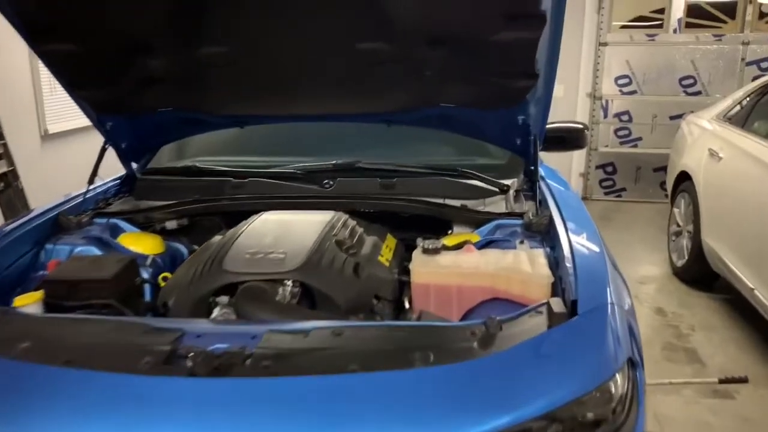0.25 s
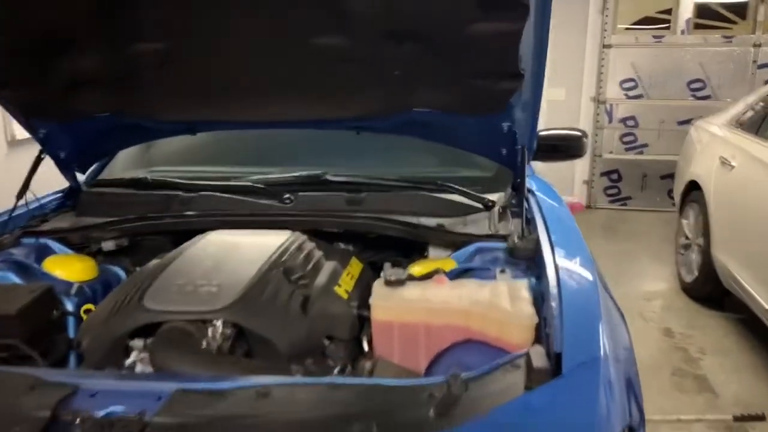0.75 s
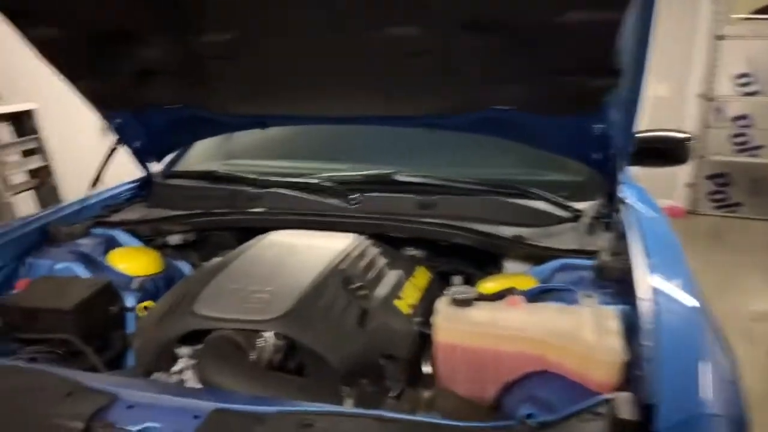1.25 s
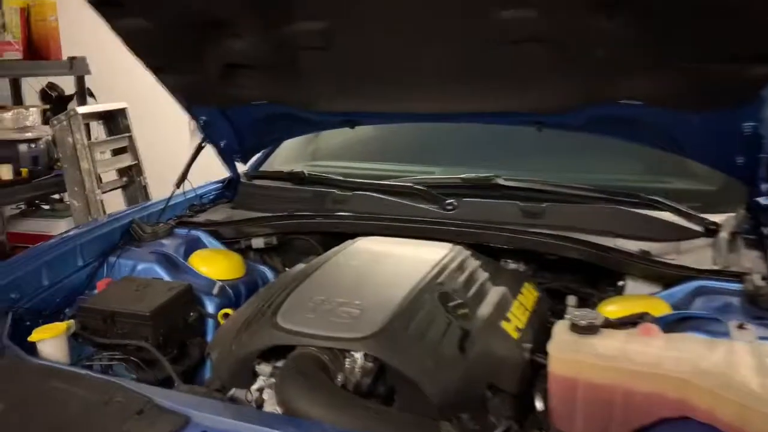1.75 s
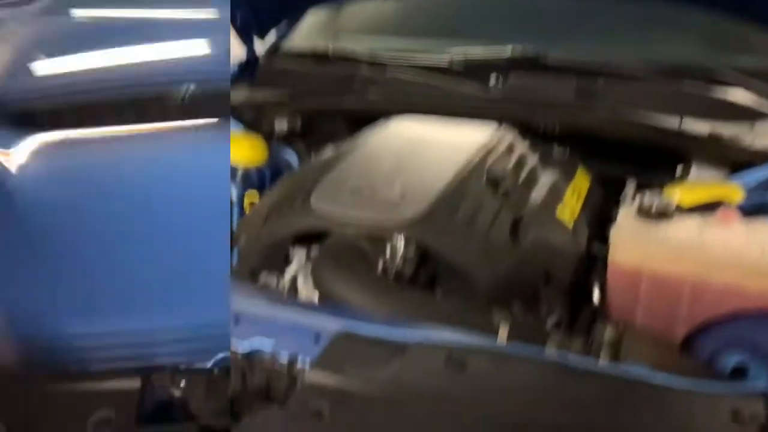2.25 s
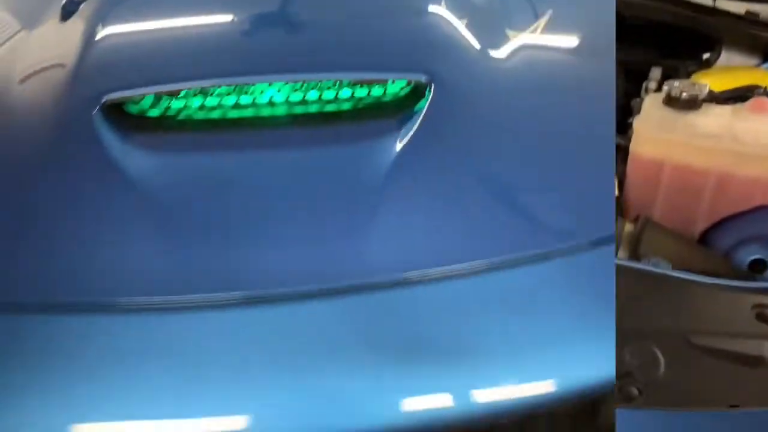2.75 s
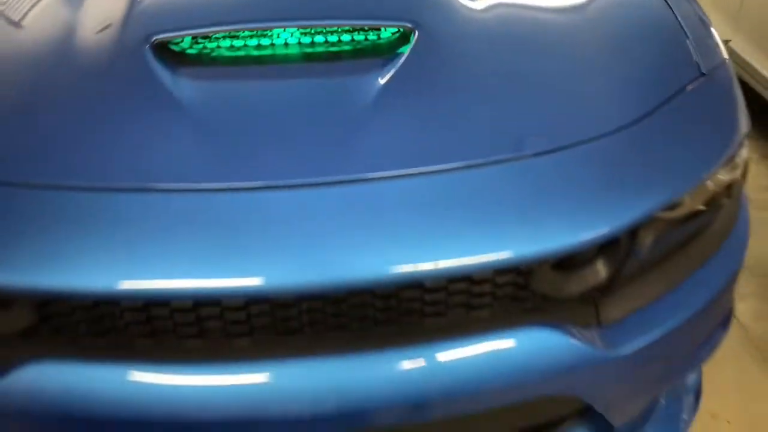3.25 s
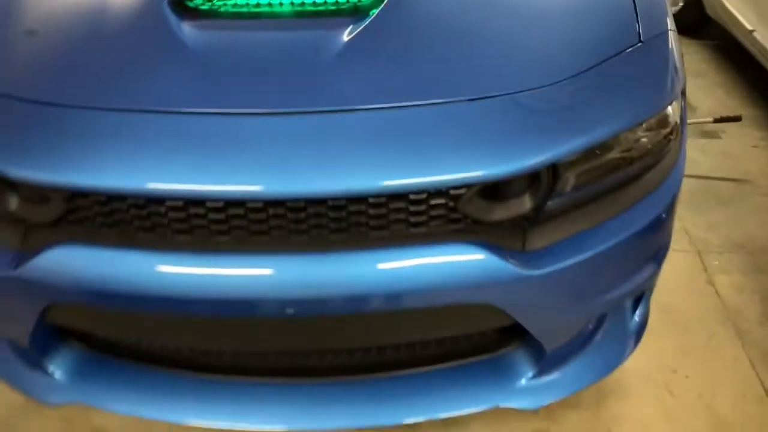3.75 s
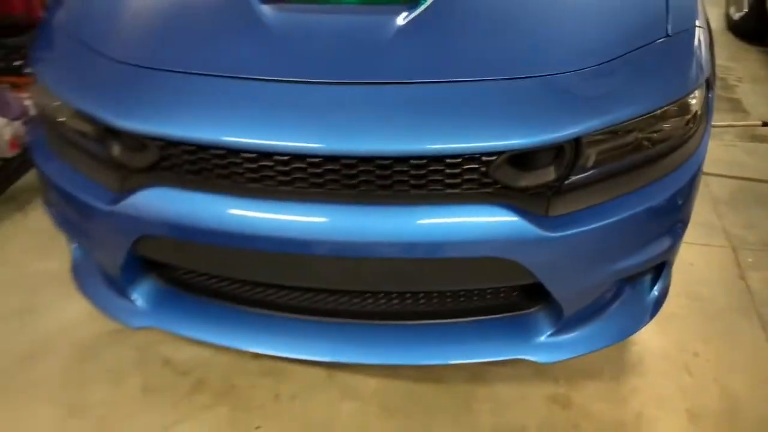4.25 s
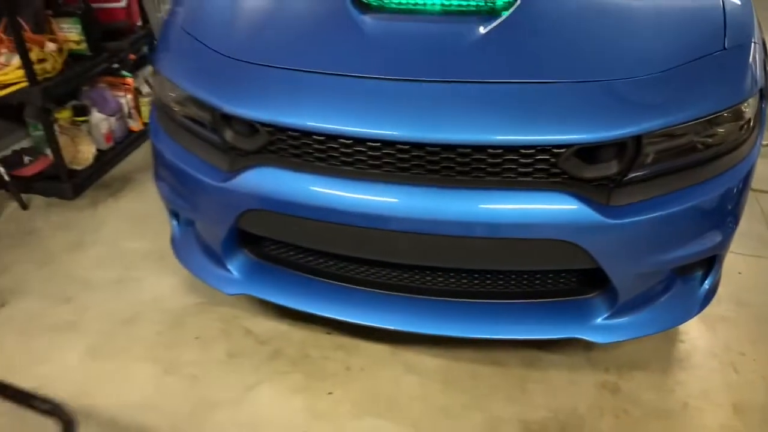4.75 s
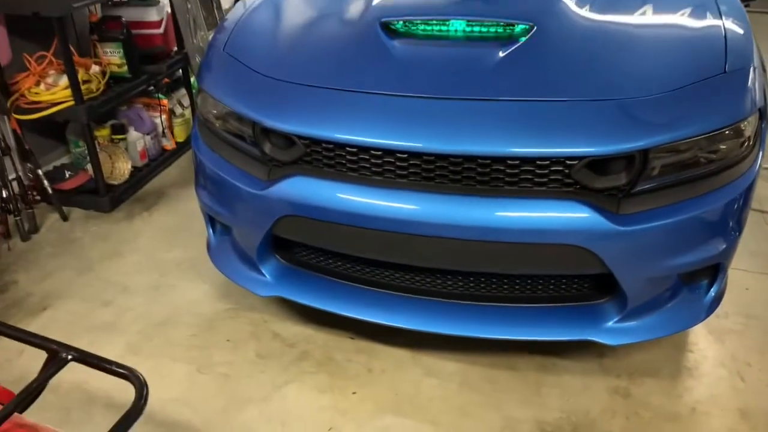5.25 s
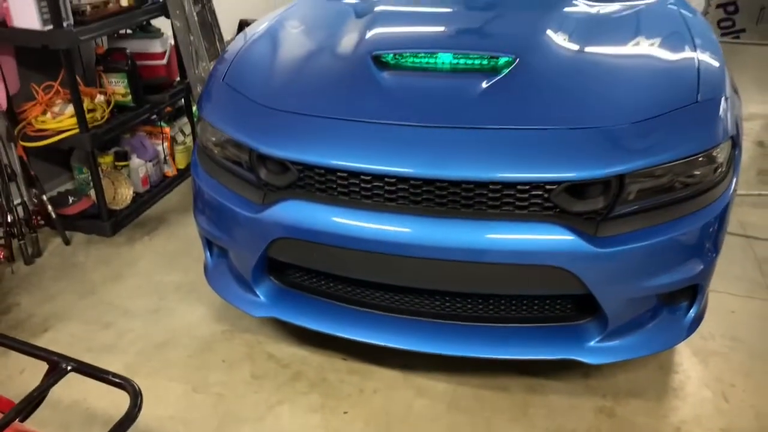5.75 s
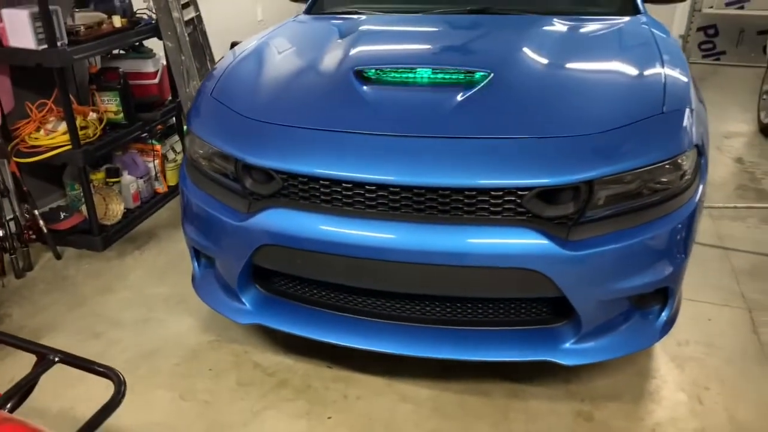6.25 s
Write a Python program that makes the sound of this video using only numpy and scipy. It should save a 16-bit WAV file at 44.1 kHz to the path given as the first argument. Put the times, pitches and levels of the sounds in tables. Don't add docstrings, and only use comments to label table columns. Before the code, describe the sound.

Faint handling rustles and scuffs in a garage, then a car hood slams with a huge flattened bang, metallic ring, and soft footsteps afterward.

```python
import sys
import numpy as np
from scipy import signal
from scipy.fft import rfft, irfft
from scipy.io import wavfile
from scipy.ndimage import uniform_filter1d, minimum_filter1d

SR = 44100
rng = np.random.default_rng(int(sys.argv[2]) if len(sys.argv) > 2 else 0)


def persist_wave(psi):
    counts = np.round(np.clip(psi, -1, 1) * 32767).astype(np.int16)
    wavfile.write(sys.argv[1], SR, np.atleast_2d(counts).T)


def volts(x):
    e = np.asarray(x, float) / 20
    return 10 ** e


N = 287091


def evened(x):
    return x / np.sqrt(np.mean(x ** 2) + 1e-20)


def coloured(x, points):
    f, db = np.transpose(points)
    hz = np.fft.rfftfreq(len(x), 1 / SR) + 1
    gain = volts(np.interp(np.log(hz), np.log(f), db, -90, -90))
    return irfft(rfft(x) * gain, len(x))


def add(mix, s, sound):
    part = mix[round(s * SR):][:len(sound)]
    part += sound[:len(part)]


def resonate(x, hz, width):
    turn = np.exp(2j * np.pi * np.cumsum(hz * np.ones(len(x))) / SR)
    r = np.exp(-np.pi * width / SR)
    return 2 * (turn * signal.lfilter([1 - r], [1, -r], x / turn)).real


def lumps(ms, depth_db):
    size = max(int(ms * SR / 1000), 1)
    wander = uniform_filter1d(uniform_filter1d(rng.standard_normal(N), size), size)
    return evened(volts(depth_db * evened(wander)))


def swells(rows, rise, fall):
    t = np.arange(0, N, 32) / SR
    power = 0
    for s, hold, db in rows:
        below_db = rise * np.maximum(s - t, 0) + fall * np.maximum(t - s - hold, 0)
        power = power + volts(db - below_db) ** 2
    return np.interp(np.arange(N) / SR, t, np.sqrt(power))


def slam():
    # (time [s], level [dB], t60 [s])
    cracks = [
        (2.2238, -6, 0.04),
        (2.238, -6.5, .04),
        (2.2465, -13.5, 0.048),
        (2.261, -20, 0.069),
    ]
    # (frequency [Hz], level [dB per Hz])
    crack_tone = [(590, -30.5), (1000, -0.5), (2230, -14), (3050, -4), (6400, -9.5), (7350, -12),
                  (9720, -6.5), (16000, -18.5)]
    # (frequency [Hz], level [dB], t60 [s])
    modes = [(204, -38.5, 1.8), (248, -30.5, 2.24), (272.4, -24, 0.67), (332.8, -17, .65),
             (395, -41.5, 2.6), (424, -39.5, 1.5), (506, -38, 1.7), (700, -53.5, 2.2), (746, -45, 2),
             (797, -45.5, 2.5), (1005, -44.5, 1), (1841, -46.5, .8), (2750, -41.5, .7), (2715, -39.5, 1.42)]
    slam_s, touch_s = 2.2245, 3.23
    t, out = np.arange(int(1.7 * SR)) / SR, np.zeros(N)

    sizzle = evened(coloured(rng.standard_normal(6000), crack_tone))
    short_t = t[:6000]
    for k, (s, db, t60) in enumerate(cracks):
        fading = volts(db - 60 * short_t / t60) * np.minimum(short_t / .0008, 1)
        add(out, s, np.roll(sizzle, 1000 * k) * fading)

    clatter = lumps(ms=5, depth_db=1.2)[:len(t)]
    add(out, slam_s, volts(-5) * boom(t) * clatter)
    add(out, slam_s + 0.0023, volts(-1.5 - 60 * t / 0.023) * np.sin(2 * np.pi * 170 * t))

    touched = np.maximum(t + slam_s - touch_s, 0)
    for (hz, db, t60), phase in zip(modes, rng.random(len(modes))):
        fall_db = 60 * t / t60
        if hz < 600:
            fall_db = fall_db + 60 * touched / 0.11
        ring = np.sin(2 * np.pi * (hz * t + phase)) * np.minimum(t / 0.06, 1)
        add(out, slam_s, volts(db - fall_db) * ring)
    return out


def boom(t):
    # (frequency [Hz], level [dB per Hz])
    body = [(28, -21), (55, 1), (95, -13), (170, -3.5), (370, 2), (620, -10.5), (1250, -13), (3500, -26.5)]
    # (frequency [Hz], level [dB per Hz])
    thin_metal = [(3500, -26.5), (8500, -30.5), (12500, -25), (15500, -41.5)]
    # (frequency [Hz], rise [s])
    rises = [(70, 0.023), (160, 0.0057), (330, 0.021), (900, 0.011), (4000, .009), (9000, 0.015)]
    # (frequency [Hz], t60 [s])
    decays = [(28, 1.8), (60, 1.09), (100, 1.08), (170, 0.64), (800, 0.84), (2500, 0.92), (7000, 0.69),
              (15500, 0.273)]
    tone = body + thin_metal[1:]
    centres = np.linspace(np.log(tone[0][0]), np.log(tone[-1][0]), num=36)
    log_hz = np.log(np.fft.rfftfreq(len(t), 1 / SR) + 1)
    noise = rfft(rng.standard_normal(len(t)))

    def at(centre, points):
        f, value = np.transpose(points)
        return np.interp(centre, np.log(f), value)

    out, power = 0, 0
    for k, centre in enumerate(centres):
        window = np.interp(log_hz, centres, np.arange(len(centres)) == k, 0)
        band = irfft(noise * window, len(t)) * volts(at(centre, tone))
        swell = 1 - np.exp(-t / at(centre, rises))
        out = out + band * swell * volts(-60 * t / at(centre, decays))
        power += np.mean(band ** 2)
    return out / np.sqrt(power)


def sole():
    # (time [s], pitch [Hz], level [dB])
    squeal = [
        (3.585, 521, -73),
        (3.65, 536.5, -68),
        (3.7, 551, -62),
        (3.74, 576, -64.5),
        (3.768, 615.4, -64),
        (3.82, 624, -67),
        (3.9, 625, -58.5),
        (3.95, 628, -58.5),
        (3.98, 632, -70),
    ]
    # (time [s], peak [dB], pitch [Hz])
    jerks = [
        (3.756, -33, 170),
        (3.8003, -30, 189),
        (3.8505, -33.5, 180),
        (3.8808, -37.5, 190),
        (3.913, -42, 201),
        (3.924, -39, 193),
    ]
    s, hz, db = np.transpose(squeal)
    t, out = np.arange(s[0], s[-1], 1 / SR), np.zeros(N)
    tone = np.sqrt(2) * np.sin(2 * np.pi * np.cumsum(np.interp(t, s, hz)) / SR)
    uneven = lumps(ms=8, depth_db=2.6)[:len(t)]
    add(out, s[0], tone * volts(np.interp(t, s, db)) * uneven * signal.windows.tukey(len(t), .2))

    t = np.arange(-.012, .025, 1 / SR)
    for s, db, hz in jerks:
        low = np.cos(2 * np.pi * hz * t - .3) * np.exp(-(t * hz / 0.48) ** 2)
        high = volts(-14) * np.cos(2 * np.pi * 430 * t) * np.exp(-(t / 0.0034) ** 2)
        add(out, s + 0.00476 + t[0], volts(db) * (low + high) / 1.34)
    return out


def slide():
    # (time [s], level [dB], centre [Hz])
    path = [
        (3.9, -89, 945),
        (3.931, -52.5, 980),
        (3.952, -55.5, 1150),
        (3.96, -57, 1900),
        (3.99, -56, 1900),
        (4.03, -71, 1590),
        (4.102, -81, 1534),
        (4.198, -82, 1400),
    ]
    s, db, hz = np.transpose(path)
    t, out = np.arange(s[0], s[-1], 1 / SR), np.zeros(N)
    grit = rng.standard_normal(len(t)) * lumps(11.0, 3.7)[:len(t)]
    centre = np.interp(t, s, hz)
    rasp = evened(resonate(resonate(grit, centre, 1150), centre, 1150))
    add(out, s[0], volts(np.interp(t, s, db)) * rasp)
    return out


def steps():
    # (time [s], peak [dB], starting pitch [Hz],
    # t60 [s], room [dB])
    footfalls = [
        (3.238, -43, 301, 0.092, -8.5),
        (3.449, -38.5, 50.3, 0.18, -24),
        (4.296, -34.5, 273, 0.0096, -7.5),
        (4.691, -56.5, 261, 0.049, -20),
        (5.37, -49, 248, 0.035, -6),
    ]
    # (time [s], peak [dB], starting pitch [Hz], t60 [s], room [dB])
    bumps = [
        (.4045, -40, 680, 0.031, -21),
        (1.102, -44, 190, 0.11, -17),
        (1.4, -48.5, 263, 0.05, -23),
        (1.6645, -43, 325, .25, -25.5),
    ]
    near, far, t = np.zeros(N), np.zeros(N), np.arange(6000) / SR
    for rows, settle, sag_s in ((footfalls, 0.524, 0.018), (bumps, 0.12, 0.01)):
        for s, db, hz, t60, room_db in rows:
            turns = np.cumsum(hz * (settle + (1 - settle) * np.exp(-t / sag_s))) / SR
            push = np.sin(2 * np.pi * turns) * volts(db - 60 * t / t60) * np.minimum(t / .001, 1)
            add(near, s, push)
            add(far, s, volts(room_db) * push)
    return near, far


def landings():
    # (time [s], peak [dB], low edge [Hz], high edge [Hz], t60 [s])
    contacts = [
        (.4045, -48, 500, 1820, 0.015),
        (.421, -45, 110, 596, 0.1),
        (1.2946, -45, 293, 1420, .08),
        (3.245, -45.5, 130, 393, 0.15),
        (3.2385, -56, 497, 1080, 0.022),
        (4.2955, -47, 345, 1270, 0.025),
        (4.305, -46, 200, 890, 0.18),
        (5.3725, -50.5, 292, 1290, 0.016),
        (5.385, -51.5, 247, 900, 0.13),
    ]
    return snaps(contacts)


def ticks():
    # (time [s], peak [dB], low edge [Hz], high edge [Hz], t60 [s])
    clicks = [(0.466, -45, 7500, 13000, 0.0044), (0.5475, -30, 700, 9800, 0.02),
              (.5797, -40, 5500, 11900, 0.014), (1.0965, -66, 3000, 12000, .01),
              (1.2927, -53, 1200, 3070, 0.023), (1.3444, -39.5, 700, 2980, 0.034),
              (1.4, -40, 2940, 12000, 0.033), (1.663, -38, 600, 5970, 0.036),
              (1.6636, -31.5, 8340, 14600, 0.022), (2.1905, -50.5, 880, 1410, 0.19),
              (2.659, -44, 8000, 12000, 0.0066), (2.667, -44, 9000, 13200, 0.0091),
              (2.8167, -30.5, 7460, 12650, 0.0027), (2.8167, -29.5, 2200, 7120, 0.0039),
              (3.092, -52, 2080, 2370, 0.013), (3.092, -54, 715, 1146, .015),
              (3.6263, -48, 850, 2700, 0.015), (3.6263, -60, 2800, 5500, .006),
              (3.9595, -55.5, 1313, 2800, 0.052), (5.9857, -44, 2080, 2650, 0.021),
              (5.9857, -60, 2370, 3600, .01)]
    return snaps(clicks)


def snaps(rows):
    out, t = np.zeros(N), np.arange(7000) / SR
    for s, db, low_hz, high_hz, t60 in rows:
        drive = rng.standard_normal(len(t)) * volts(-9.0 - 60 * t / t60) + (t == 0)
        band = signal.butter(2, [low_hz, high_hz], "band", fs=SR, output="sos")
        burst = signal.sosfilt(band, drive)
        add(out, s - .0003, volts(db) * burst / abs(burst).max())
    return out


def scuffs():
    # (time [s], hold [s], level [dB], centre [Hz])
    moves = [(0, .15, -61.5, 485), (.2, .18, -67, 480), (0.398, .02, -62, 447), (.552, .01, -60, 450),
             (.76, .1, -63, 880), (.95, .2, -69, 1070), (1.29, .02, -66, 1220), (1.352, .05, -59, 2310),
             (1.45, .08, -66.5, 1890), (4.66, 0.014, -64.5, 493), (6.26, .04, -61, 1650)]
    drags = np.array(moves)
    grit = rng.standard_normal(N) * lumps(3.3, 3.7)
    centre = np.interp(np.arange(N) / SR, drags[:, 0], drags[:, -1])
    scuff = resonate(resonate(grit, centre, 2900), centre, 2900)
    scuff /= np.sqrt(uniform_filter1d(scuff ** 2, size=8000))
    return scuff * swells(drags[:, :-1], rise=330, fall=240)


def handling():
    # (frequency [Hz], level [dB per Hz])
    rumble_tone = [(8.8, -40), (15, -8), (43, 4), (87, -2), (95, -9), (108, -14.5), (200, -23), (260, -43),
                   (440, -120)]
    # (time [s], hold [s], level [dB])
    jolts = [(.165, .02, -60), (.35, 0.15, -68), (.495, .03, -47), (.56, 0.086, -48.5), (.78, 0.019, -61),
             (1.09, .06, -53), (1.39, 0.039, -58), (1.65, 0.072, -55), (2.75, 0.027, -42),
             (2.86, 0.026, -39), (2.94, 0.09, -49), (3.09, 0.64, -59), (3.76, 0.08, -62),
             (4.49, 0.032, -56), (5.12, 0.026, -60)]
    rumble = evened(coloured(rng.standard_normal(N), rumble_tone) * lumps(25, 2.5))
    tremor = volts(-61.5 - 0.22 * np.arange(N) / SR)
    return rumble * np.hypot(tremor, swells(jolts, rise=460, fall=460))


def cloth():
    # (frequency [Hz], level [dB per Hz])
    rustle_tone = [(1800, 3), (3000, 3), (4500, 0), (5700, -8), (7000, -3.5), (12500, -2), (15000, -13),
                   (16200, -16)]
    # (time [s], hold [s], level [dB], coarse part against the fine hiss [dB])
    rubs = [(0, 0.095, -69.5, 10), (0.114, 0.037, -62, 4.5), (0.277, 0.013, -59, 2.5),
            (0.35, 0.18, -71, 7.5), (.56, 0.064, -57, -4), (0.757, .06, -61.5, -5.5),
            (0.862, 0.14, -69.5, 0), (1.02, 0.062, -66, 0.5), (1.16, 0.01, -61, -1), (1.21, 0.071, -73, 7),
            (1.347, 0.014, -60.5, -2), (1.393, 0.037, -64, 2), (1.45, 0.022, -68, 2),
            (3.25, 0.69, -76.5, 0), (3.85, 0.17, -69, -3), (4.071, 0.058, -68.5, 0), (4.31, .02, -77, 0),
            (4.66, .04, -63, -8), (4.82, 0.039, -70.5, -3), (5.39, .02, -76.5, -2),
            (5.699, 0.41, -80.5, 6.5), (5.77, .03, -76, 0), (6.274, 0.13, -71, 2.5)]
    crackle = rng.standard_normal(N) * lumps(1.5, 1.5) * lumps(15, 1.8)
    rustle = evened(coloured(crackle, rustle_tone))
    coarse = irfft(rfft(rustle) * (np.fft.rfftfreq(N, 1 / SR) < 4400), N)
    fine_rows = [(s, hold, db) for s, hold, db, _ in rubs]
    coarse_rows = [(s, hold, db + part_db) for s, hold, db, part_db in rubs]
    fine = (rustle - coarse) * swells(fine_rows, rise=530, fall=270)
    return fine + coarse * swells(coarse_rows, rise=530, fall=270)


def garage(x):
    t = np.arange(SR) / SR
    tail = resonate(rng.standard_normal(SR), 0, 2470)
    tail = tail * volts(-60 * t / 0.7) * (t > .008)
    return signal.fftconvolve(x, tail / np.linalg.norm(tail))[:N]


def still_air():
    # (frequency [Hz], level [dB per Hz])
    air_tone = [(59, -39), (100, -1), (206, -9), (365, -8.5), (910, -14.5), (1060, -13), (10000, -30),
                (14400, -34), (16000, -45)]
    return volts(-66.5) * evened(coloured(rng.standard_normal(N), air_tone))


def scene():
    near, far = steps()
    tick, landing, rubber = ticks(), landings(), sole()
    scuff = scuffs() + slide()
    wet = garage(far + volts(-17.0) * tick + volts(-11) * landing + volts(-17) * rubber + volts(-7.5) * scuff)
    feet = near + landing + rubber + scuff
    return (slam() + feet + tick + handling() + cloth() + wet + still_air())[None]


def top_cut(x):
    return signal.sosfilt(signal.butter(12, 16810, fs=SR, output="sos"), x)


def record(dry):
    limit_db, release_db_s, ratio = -15, 121, 6
    shock_share, shock_s = 0.54, 0.064
    power_db = 10 * np.log10(abs(uniform_filter1d(dry[0] ** 2, size=120)) + 1e-12)
    fall = np.arange(N) * release_db_s / SR
    held_peak_db = np.maximum.accumulate(power_db + fall) - fall
    over_db = np.maximum(held_peak_db - limit_db, 0)
    ahead_db = -minimum_filter1d(-over_db, size=160)
    keep = np.exp(-1 / (shock_s * SR))
    shock_db = np.maximum(ahead_db - signal.lfilter([1 - keep], [1, -keep], ahead_db), 0)
    cut_db = (1 - 1 / ratio) * ahead_db + shock_share * shock_db
    held = dry / volts(uniform_filter1d(cut_db, size=100))
    mix = signal.oaconvolve(held, signal.firwin(255, 16000, fs=SR)[None], "same")
    return top_cut(mix)


dry = scene()
out = record(dry)
persist_wave(out)
```